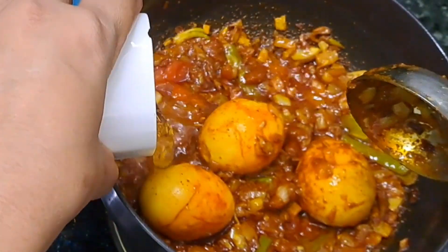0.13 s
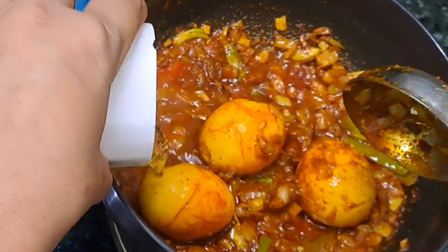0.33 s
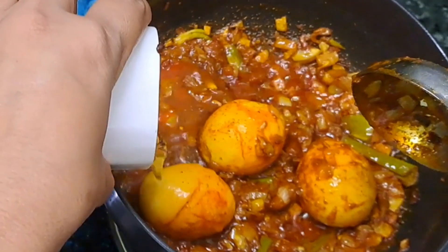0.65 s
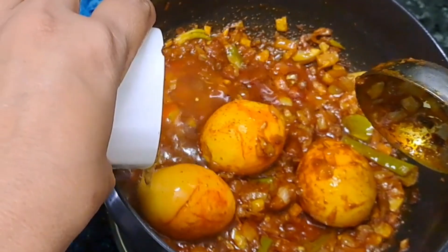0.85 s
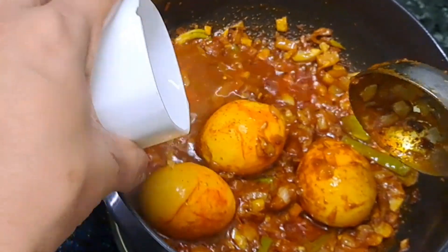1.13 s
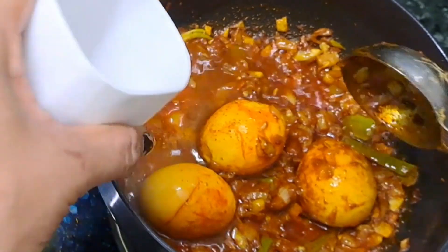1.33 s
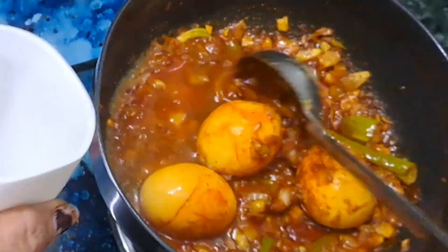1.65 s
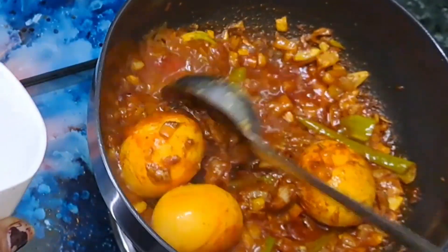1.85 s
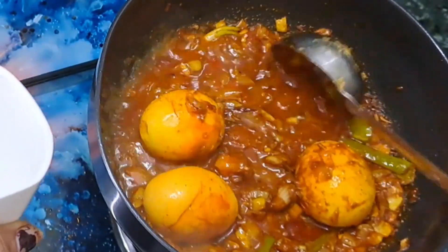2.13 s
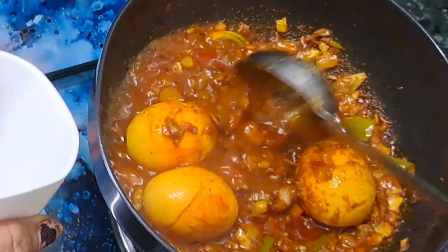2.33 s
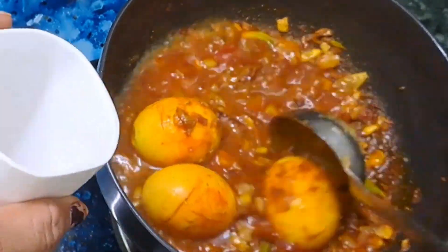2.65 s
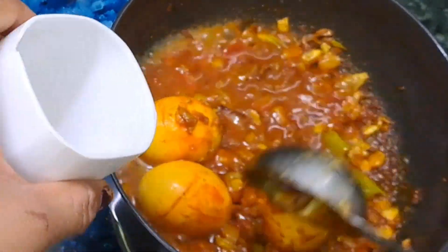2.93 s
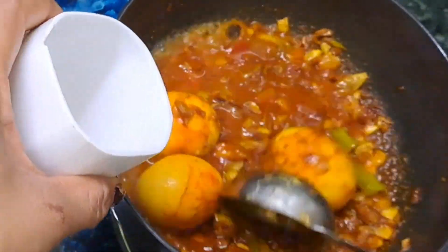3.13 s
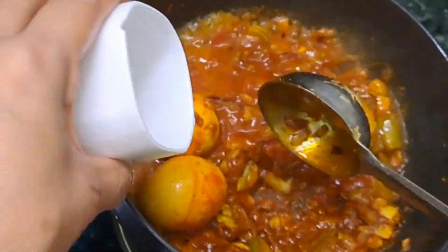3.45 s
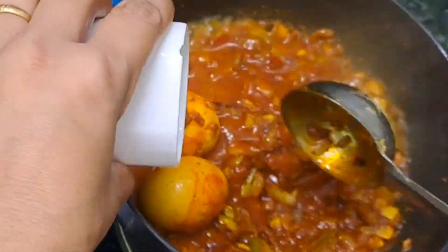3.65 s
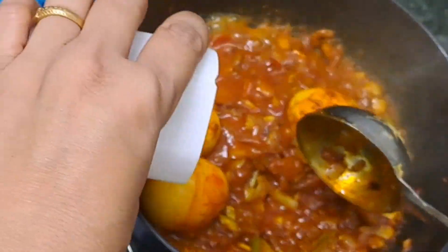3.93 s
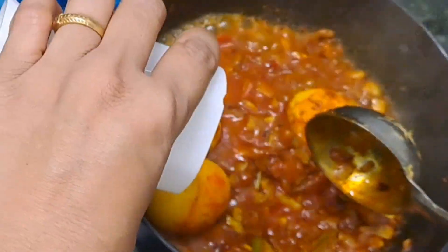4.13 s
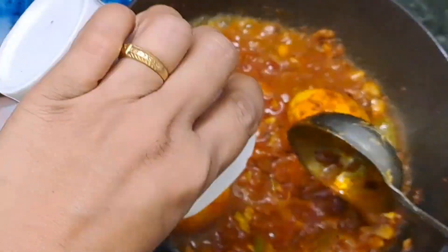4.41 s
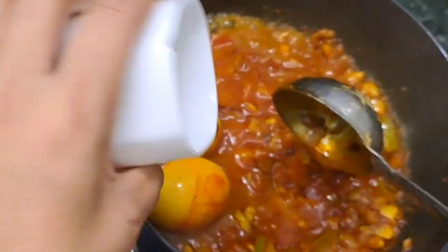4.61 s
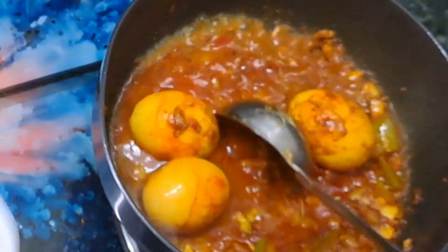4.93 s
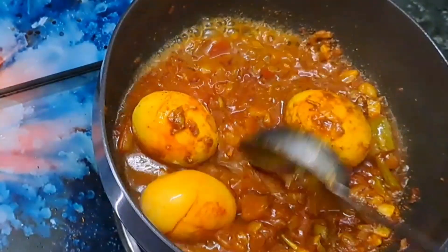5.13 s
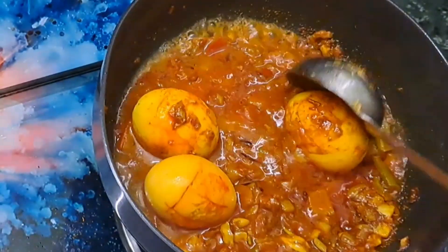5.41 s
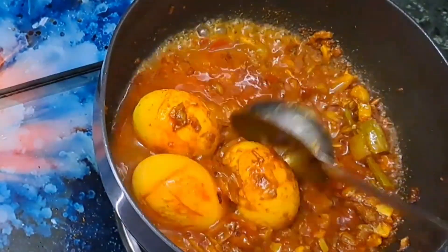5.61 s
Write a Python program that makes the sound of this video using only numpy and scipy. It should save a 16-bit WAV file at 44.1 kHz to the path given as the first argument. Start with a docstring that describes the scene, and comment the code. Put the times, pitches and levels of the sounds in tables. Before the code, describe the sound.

Hot curry masala sizzles softly in a pan, spitting a few sharp ticks. Water is poured in and the sizzle swells into a dense, bright hiss of tiny bubbles, flaring as it is stirred. It eases, rises again with a finer hiss around a second pour, then settles. The sound is close, in a small kitchen, with a faint low stove rumble underneath.

```python
"""Water poured into hot curry

Dry masala spits in a hot pan; then water is poured in twice. Thousands of steam bubbles a second burst,
each a damped oscillator, and add up to a sizzle that flares with each pour and stir. Air resonances in
the pan and the emptied cup colour the sound, and reflections in the small kitchen smear it into a hiss.
The stove rumbles faintly below."""
import sys
import numpy as np
from scipy import signal
from scipy.fft import rfft, irfft
from scipy.io import wavfile

SR = 44100
rng = np.random.default_rng(int(sys.argv[2]) if len(sys.argv) > 2 else 0)


def transcribe(u):
    """Save the signal u as a 16-bit wav file named by the first command-line argument.

    u: samples, shape (n,) or (channels, n), limited to [-1, 1]; the rate is SR.
    q: integer samples, one column per channel.
    """
    v = np.clip(np.atleast_2d(u).T, -1, 1)
    q = np.round(v * 32767).astype(np.int16)
    wavfile.write(sys.argv[1], SR, q)


N = 254456
TIME = np.arange(N) / SR
HZ = np.fft.rfftfreq(8192, 1 / SR)

# share of the pan that the water has reached: (time [s], share [0-1])
WETTED_SHARE = [(0, 0.35), (.6, 0.33), (1.2, 0.79), (2.0, 0.96), (5.77, 0.96)]
# colour of the sizzle at the left microphone port: (frequency [Hz], gain [dB])
LEFT_RESPONSE = [(780, -14), (1200, -16), (1600, -7), (2000, -11.5), (2700, -5), (3400, -3.5), (4200, 0.5),
                 (4950, -1), (6000, -1.5), (7200, -11.5), (8700, -14), (10800, -5.5), (13200, -15.5),
                 (15400, -18.5)]


def amp(db):
    """Amplitude ratio: tenfold for every 20 dB."""
    return 10 ** (np.asarray(db) / 20)


def unit(x):
    """Normalisation to an rms of 1."""
    return x / np.sqrt(np.mean(x ** 2) + 1e-20)


def curve(points):
    """Linear interpolation of (time [s], value) points."""
    return np.interp(TIME, *np.transpose(points))


def swell(middle, length):
    """Raised-cosine envelope: a smooth rise from 0 to 1 and back."""
    return np.cos(np.pi * np.clip((TIME - middle) / length, -.5, .5)) ** 2


def wander(slow_hz, fast_hz):
    """Pink-noise drift of rms 1: equal power in each octave between two rates."""
    count, rate_hz = 4096, 500
    hz = np.fft.rfftfreq(count, 1 / rate_hz) + 1e-3
    white = rfft(rng.standard_normal(count))
    drift = irfft(white * (hz > slow_hz) * (hz < fast_hz) / np.sqrt(hz))
    return unit(np.interp(TIME, np.arange(count) / rate_hz, drift))


def spectrum(points):
    """Frequency response through (frequency [Hz], gain [dB]) points, interpolated on log axes."""
    hz, db = np.transpose(points)
    return amp(np.interp(np.log(HZ + 1), np.log(hz + 1), db))


def band(low_hz, high_hz, order):
    """Band-pass gain with power-complementary edges: adjoining bands add up to even power."""
    return ((1 + (low_hz / (HZ + 1)) ** order) * (1 + (HZ / high_hz) ** order)) ** -.5


def colour(x, gain):
    """Minimum-phase filtering: the response is causal, so clicks keep their sharp start."""
    log_gain = np.log(np.maximum(np.r_[gain, gain[-2:0:-1]], 1e-5))
    response = np.exp(np.conj(signal.hilbert(log_gain)))
    taps = np.fft.ifft(response).real[:len(HZ)]
    return signal.oaconvolve(x, taps)[:N]


def diffuse(null_hz=2500, likeness=0.76):
    """Diffuse-field coherence: noise at two ports is alike in the bass, unrelated in the treble."""
    left, other = rfft(rng.standard_normal((2, N)))
    coherence = likeness * np.sinc(np.fft.rfftfreq(N, 1 / SR) / null_hz)
    right = coherence * left + np.sqrt(1 - coherence ** 2) * other
    return irfft(np.array([left, right]), N)


def kitchen(pair, gain, wet_db, t60_s):
    """Reverberation: reflections from pan and tiles merge into a hiss that decays exponentially."""
    retained = np.exp(-2 * np.log(1000) / (t60_s * SR))
    power = signal.lfilter([1 - retained], [1, -retained], (pair ** 2).mean(0))
    hiss = unit(np.array([colour(side, gain) for side in diffuse()]))
    return pair + amp(wet_db) * np.sqrt(power) * hiss


def through_pan(pair, gain, edge_hz=740, below_db=-10.0):
    """Cavity resonance: the bowl, then each port, colours a stereo sound, returned at rms 1."""
    # air resonances and notches of the bowl: (frequency [Hz], width [Hz], lift [dB])
    bowl_modes = [(787, 52, 6), (880, 55, -1.5), (946, 23, 5), (1040, 92, 4), (1380, 21, -1.5),
                  (1555, 7.5, -27), (3763, 33, 6), (4950, 56, 5), (5070, 150, 1.5)]
    # colour of the sizzle at the right microphone port: (frequency [Hz], gain [dB])
    right_response = [(780, -17), (1200, -16.5), (1450, -11.5), (2000, -16), (2800, -12), (3500, -13.5),
                      (4100, -9.5), (5000, -14.5), (6300, -13.5), (7100, -12), (9400, -16), (10800, -14.5),
                      (11900, -8), (13500, -18.5), (15300, -2.5)]
    lift_db = sum(db / (1 + (2 * (HZ - hz) / width) ** 2) for hz, width, db in bowl_modes)
    bowl = amp(lift_db + below_db * band(0, edge_hz, order=60) ** 2)  # weak below its lowest mode
    ports = spectrum(LEFT_RESPONSE), spectrum(right_response)
    return unit(np.array([colour(x, gain * bowl * port) for x, port in zip(pair, ports)]))


def stove(split_hz=180, flame_db=-54, drone_hz=81.8, waver_db=1.4, waver_turns=0.11):
    """Noise and modulated tones superpose: a rumble with a drone, the burner's rush and a faint hum."""
    # stove and kitchen background: (frequency [Hz], relative spectral density [dB])
    background = [(25, -2), (45, 11), (65, 13), (100, 10), (150, 1.5), (180, -7.5), (240, -2.5),
                  (310, -4.5), (440, -8), (520, -8.5), (700, -6)]
    # partials of the hum: (frequency [Hz], level [dB])
    hum_partials = [(301.5, -65.5), (398.4, -65.5), (581.4, -69)]
    # swells and dips of rumble and drone: (middle [s], length [s], change [dB])
    rumble_swells = [(0.783, .2, 5), (1.15, 0.67, -2.5), (1.89, 0.18, 5), (2.25, .4, 2.5), (2.51, .25, -13),
                     (2.75, 0.34, 5.5), (3.649, 0.76, -5), (4.062, 0.26, -18), (4.23, .2, 5),
                     (5.12, 0.37, 8)]
    # burner and hum sink while a hand covers the pan: (middle [s], length [s], change [dB])
    hand_cover = (4.3, 2.1, -3.5)
    shape = spectrum(background)
    rumble = unit(np.array([colour(x, shape * band(7.2, split_hz, order=8)) for x in diffuse()]))
    flame = unit(np.array([colour(x, shape * band(split_hz, 1070, order=8)) for x in diffuse()]))
    tones = []
    for hz, db in [(drone_hz, -5.5), *hum_partials]:
        amplitude = np.sqrt(2) * amp(db + waver_db * wander(.7, 10.0))
        turns = hz * TIME + waver_turns * wander(.5, 9.2)
        tones.append(amplitude * np.sin(2 * np.pi * turns))
    drone, *hum = tones
    swells_db = sum(db * swell(middle, length) for middle, length, db in rumble_swells)
    bass_db = -55.5 - 0.68 * TIME + swells_db + 1.5 * wander(2, 8)  # sinks slowly and unsteadily
    middle, length, covered_db = hand_cover
    burner = (amp(flame_db) * flame + sum(hum)) * amp(covered_db * swell(middle, length))
    return (amp(-2.0) * rumble + drone) * amp(bass_db) + burner


def pops(start, strength, hz, cycles, samples):
    """Damped oscillators: each pop is a sine that falls to 1/e in the given number of cycles."""
    index = np.ceil(start * SR).astype(int)[:, None] + np.arange(samples)
    turns = ((index / SR - start[:, None]) * hz[:, None]).astype(np.float32)
    rings = strength[:, None] * np.exp(-turns / cycles) * np.sin(2 * np.pi * turns)
    return np.bincount(np.clip(index, 0, N).ravel(), rings.ravel(), N + 1)[:N]


def bubbles(low_hz, high_hz, rate, spread_db, cycles, level_db, thinning=.6, lag_s=7e-5, scatter_s=4e-5):
    """Shot noise at rms 1: bubbles pop at random, more sparsely in a gentler boil or a drier pan."""
    when, pitch, size, chance, place, side = rng.random((50000, 6)).T
    activity = amp(thinning * (level_db - level_db.max())) * curve(WETTED_SHARE)
    bursts = chance < activity[(when * N).astype(int)] * rate * TIME[-1] / len(chance)
    start = when[bursts] * TIME[-1]
    hz = low_hz + pitch[bursts] * (high_hz - low_hz)
    strength = amp(spread_db * np.minimum(-np.log(size[bursts]), 4.5)) * np.sqrt(hz)
    lag = lag_s + scatter_s * np.sqrt(3) * (2 * place[bursts] - 1)  # the pan is nearer the right port
    lean = amp(4.0 * (2 * side[bursts] - 1.5))
    samples = int(8 * cycles * SR / (low_hz + high_hz))
    left = pops(start + lag, strength * lean, hz, cycles, samples)
    right = pops(start, strength / lean, hz, cycles, samples)
    return unit(np.array([left, right]) / np.sqrt(activity))  # even power, however sparse the pops


def boil(size_step, dry_db, share_db, delay_s, fade_ratio):
    """Incoherent sources add in power: the level in dB of one bubble size, summed over the flares."""
    # poured or stirred water spreads over hot metal, which then cools:
    # (start [s], rise [s], peak [dB], decay time [s], lean to finer bubbles [dB per size])
    flares = [(.55, 0.43, -30.5, 1, -1.5), (1.09, .19, -32, 1.5, -2), (1.32, .37, -30.5, 0.65, -1.5),
              (1.69, .28, -24.5, 0.76, .4), (2.01, .32, -32, .18, -1.6), (2.74, 0.25, -29.5, 1.3, 2),
              (3.24, .25, -24.5, 0.48, 0.5), (3.44, .21, -32.5, 1.2, 8), (4.5, 0.55, -33.5, 0.15, 1.3),
              (5.34, .15, -32, 0.63, 1)]
    power = amp(dry_db) ** 2
    for start, rise_s, peak_db, fade_s, lean_db in flares:
        age = TIME - start - delay_s
        spreading = np.clip(age / rise_s, 0, 1) ** 2
        cooling = np.exp(-np.maximum(age - rise_s, 0) / (fade_s * fade_ratio))
        power = power + amp(peak_db + share_db + lean_db * size_step) ** 2 * spreading * cooling
    return 10 * np.log10(power)


def sizzle(surge_db=0.4, ringing_rate=380, ringing_cycles=53.0, sway_db=.5, leftward_db_per_s=.5):
    """Bubble resonance: four sizes, the smaller the higher, flutter on their own and surge together."""
    # steam bubbles, large to tiny: (lowest pitch [Hz], highest pitch [Hz], rate before thinning [1/s],
    # strength spread [dB], decay [cycles], flutter [dB], ringing share in a fully wet pan [dB])
    bubble_sizes = [(301, 2800, 9000, 1.0, 1.03, -0.27, -6.5), (2797, 4300, 5500, 1, 2.4, -1.3, -6),
                    (4215, 7000, 7000, 1.5, 1.4, 0.53, -7), (6880, 14800, 8000, 3, 1.4, 0.17, -10.5)]
    # how each size answers water on hot metal:
    # (level in dry masala [dB], share of a flare [dB], delay [s], decay time [multiple of the flare's])
    boil_response = [(-43, -10, .03, 1.0), (-41.5, -4.5, 0, 1.0), (-36.5, 0, .06, 1.0), (-34, 0, 0.026, .8)]
    surge = surge_db * wander(11, 42)
    layers = []
    for k, (low_hz, high_hz, rate, spread_db, cycles, flutter_db, ringing_db) in enumerate(bubble_sizes):
        level_db = boil(k - 2, *boil_response[k])
        gain = band(low_hz, high_hz, order=24)
        bursting = bubbles(low_hz, high_hz, rate, spread_db, cycles, level_db)
        bursting = unit(kitchen(bursting, gain, wet_db=-1.0, t60_s=0.12))
        # once water covers the masala, some bubbles stay whole under the surface and ring on
        ringing = bubbles(low_hz, high_hz, ringing_rate, 1.8, ringing_cycles, level_db)
        submerged = amp(ringing_db) * curve(WETTED_SHARE)
        pair = np.sqrt(1 - submerged ** 2) * bursting + submerged * ringing
        layers.append(through_pan(pair, gain) * amp(level_db + surge + flutter_db * wander(8.2, 60)))
    *coarser, finest = layers
    side_db = sway_db * wander(1, 5.2) + leftward_db_per_s * (TIME - TIME.mean())
    return sum(coarser) + finest * amp([side_db / 2, -side_db / 2])


def spatters(ticks_per_s=3000, edge_ratio=0.99):
    """Filtered impulse noise: each splash bursts into a brief cloud of ticks around one pitch."""
    # water fizzing away in the oil: (middle [s], length [s], level [dB], pitch [Hz])
    splashes = [(0.144, .16, -35, 11000), (.14, .16, -35.5, 5000), (0.38, .06, -34, 5900),
                (.405, 0.12, -33, 11200), (0.632, 0.078, -31.5, 4300), (.69, 0.054, -28, 3900),
                (.69, .06, -32, 2400), (.82, 0.065, -36, 11000), (1.3, 0.14, -33, 3500),
                (1.45, .08, -29, 5000), (1.727, 0.23, -29, 3900), (2.086, .14, -28, 5200),
                (2.4, .08, -29, 5200), (3.505, 0.21, -29.5, 3400), (4.04, 0.21, -24, 11300),
                (5.148, .14, -33, 3307)]
    ticks = rng.standard_normal((2, N)) * (rng.random(N) < ticks_per_s / SR)
    return sum(
        through_pan(ticks, band(hz / edge_ratio, hz * edge_ratio, order=8))
        * amp(db) * swell(middle, length)
        for middle, length, db, hz in splashes)


def spits(lag_s=.00003, ring_s=.0004):
    """Flash evaporation: drops turn to steam in the hot oil, each a sharp tick with a short splash."""
    # single drops: (time [s], level before filtering [dB], pitch [Hz], left minus right [dB])
    drops = [(0.0987, -13, 5000, 15), (0.1263, -17, 5300, 7), (0.13, -13, 11400, 10),
             (0.1315, -17, 4800, 7), (0.3776, -4.5, 12200, -3), (0.4205, -13, 10500, 10),
             (0.4393, -14, 10700, 9), (0.5234, -15, 4540, 8), (0.633, -19, 5000, 6),
             (0.6855, -15, 7400, -2), (0.7977, -15, 10900, 7), (0.8115, -14, 10900, 9),
             (0.8196, -16, 10700, 12), (3.2777, -11, 5050, 7), (4.6833, -9, 5470, 6)]
    start, level_db, hz, side_db = np.transpose(drops)
    cycles = ring_s * hz[:, None]
    left = pops(start + lag_s, amp(level_db + side_db / 2), hz, cycles, samples=200)
    right = pops(start, amp(level_db - side_db / 2), hz, cycles, samples=200)
    treble = band(4700, 20000, order=8)
    ticks = np.array([colour(left, treble), colour(right, treble)])
    return kitchen(ticks, treble * spectrum(LEFT_RESPONSE), wet_db=-7.0, t60_s=0.034)


def fresh_water(low_hz=3100, high_hz=3550):
    """Viscous damping: thin water damps its bubbles less than gravy does, so they ring longer."""
    # ringing where fresh water meets the hot metal: (time [s], level [dB])
    ringing_levels = [(0, -49), (.8, -46), (.93, -40), (1.35, -33), (1.6, -39), (2.0, -34.5), (2.95, -41),
                      (3.5, -36), (4.2, -43.5), (4.6, -52), (5.77, -52)]
    level_db = curve(ringing_levels)
    pair = bubbles(low_hz, high_hz, rate=900, spread_db=2.5, cycles=8.4, level_db=level_db, thinning=.19)
    return through_pan(pair, band(2850, 3800, order=12)) * amp(level_db)


def cup():
    """Forced resonance: the hiss excites the air in the emptied cup while it is held over the pan."""
    # rings of the cup: (middle [s], length [s], level [dB], pitch [Hz], half-width [Hz])
    cup_rings = [(1.353, 1, -45, 925, 199), (4.349, 1.0, -50, 1033, 30)]
    hiss = diffuse()
    return sum(through_pan(hiss, 1 / (1 + ((HZ - hz) / width) ** 2)) * amp(db) * swell(middle, length)
               for middle, length, db, hz, width in cup_rings)


def scene():
    """Superposition: the sound pressures of pan, cup and stove add."""
    return sizzle() + fresh_water() + spatters() + spits() + cup() + stove()


def record(dry, cutoff_hz=15620):
    """Band limiting: a steep linear-phase low-pass removes the highest treble."""
    taps = signal.firwin(601, cutoff_hz, window=("kaiser", 9), fs=SR)
    return signal.oaconvolve(dry, taps[None], "same")


dry = scene()
out = record(dry)
transcribe(out)
```